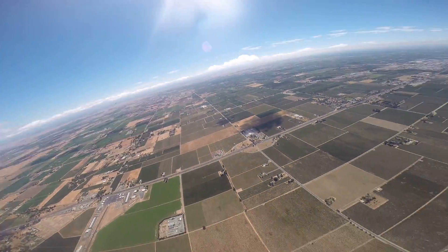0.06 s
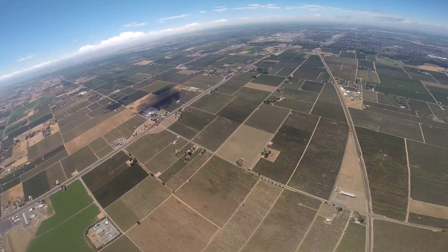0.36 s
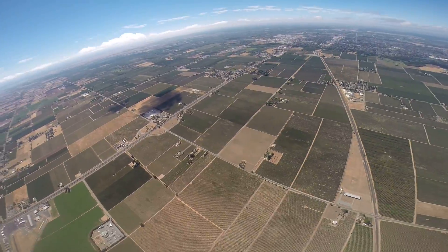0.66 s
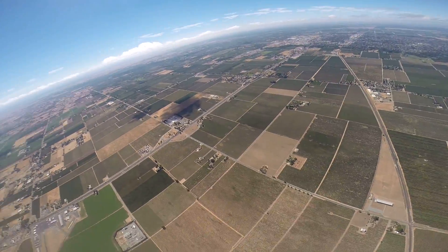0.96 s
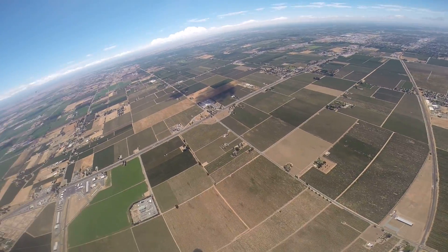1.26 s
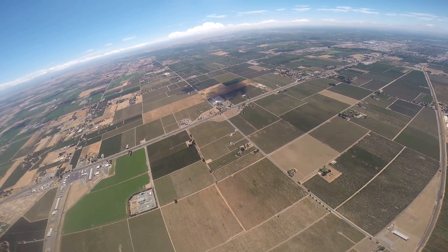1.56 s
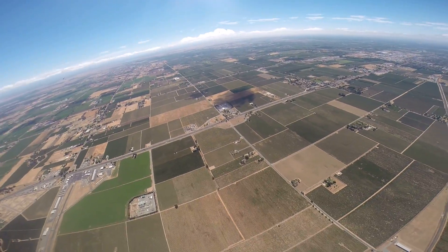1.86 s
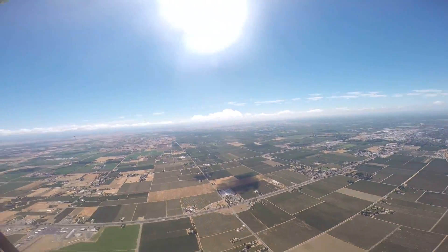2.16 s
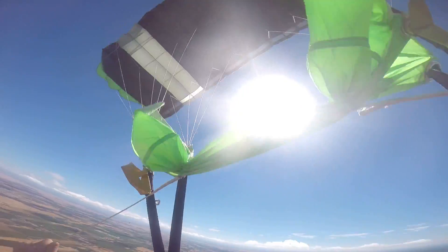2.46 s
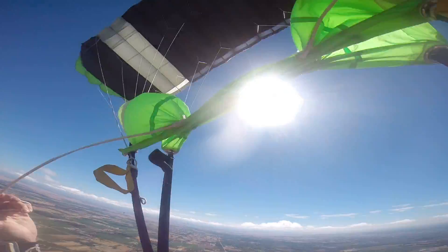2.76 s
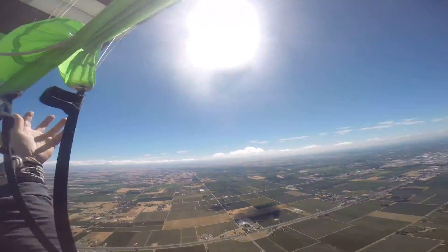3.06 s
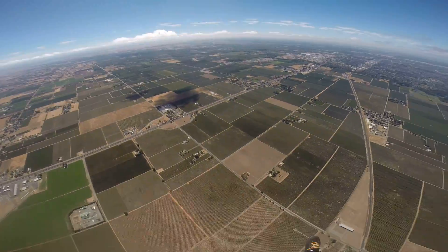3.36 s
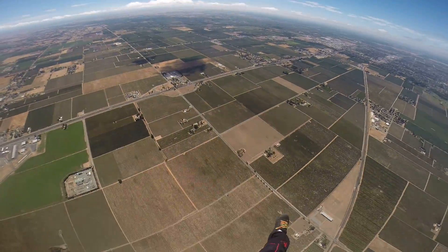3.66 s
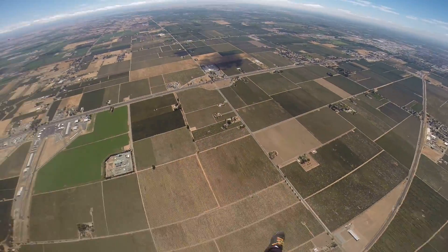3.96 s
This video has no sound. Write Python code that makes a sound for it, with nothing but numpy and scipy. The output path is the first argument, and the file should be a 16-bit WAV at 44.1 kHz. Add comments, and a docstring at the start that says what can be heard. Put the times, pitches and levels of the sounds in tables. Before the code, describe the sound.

Wind rushes over a head-worn microphone under an open parachute, strongest in the first second, when the canopy cloth snaps several times. The rush then eases. From about 2.4 to 3.1 seconds, low throbbing buffets hit the microphone while harness fabric rustles and ticks. A faint, high, breathy whistle of air passes around 3.3 seconds, and a piece of gear clacks close by at 3.8 seconds.

```python
"""Wind under an open parachute

Air rushes past a head-worn camera, rings the hollows of its housing and eases off.
As the head tips back, eddies buffet the microphone and harness fabric rustles; as it swings
forward, air whistles on the housing's edge. The canopy cloth snaps a few times as it pulls taut.
Near the end a piece of gear clacks close by."""
import sys
import numpy as np
from scipy import signal
from scipy.fft import rfft, irfft
from scipy.io import wavfile

SR = 44100
rng = np.random.default_rng(int(sys.argv[2]) if len(sys.argv) > 2 else 0)


def inscribe(sig):
    """Save sig as 16-bit PCM at rate SR to the path in sys.argv[1].

    A 1-D sig is mono; a 2-D sig holds one channel per row.
    Samples are clipped to [-1, 1] before scaling.
    """
    pcm = np.round(np.clip(np.atleast_2d(sig).T, -1, 1) * 32767)
    wavfile.write(sys.argv[1], SR, pcm.astype(np.int16))


N = 176400
TIME_S = np.arange(N) / SR


def from_db(db):
    """Decibels to gain."""
    return 10 ** (np.asarray(db) / 20)


def rms_one(x):
    """Scale to unit rms."""
    return x / np.sqrt(np.mean(x ** 2) + 1e-20)


def in_time(rows):
    """Interpolate each column after the first (seconds) to every sample."""
    times_s, *columns = np.transpose(rows)
    return [np.interp(TIME_S, times_s, column) for column in columns]


def at_hz(points, hz):
    """Read (Hz, value) points on a log-frequency axis."""
    points_hz, values = np.transpose(points)
    return np.interp(np.log(hz + 1e-9), np.log(points_hz), values)


def shape(x, gain_at):
    """Filter x by gain_at(hz)."""
    return irfft(rfft(x) * gain_at(np.arange(N // 2 + 1) * SR / N), N)


def noise(colour):
    """Unit-rms noise. Each row of colour: frequency in Hz, relative level in dB."""
    return rms_one(shape(rng.standard_normal(N), lambda hz: from_db(at_hz(colour, hz))))


def drift(rate_hz):
    """Unit-rms random wander, from 1 Hz to about rate_hz."""
    return rms_one(shape(rng.standard_normal(N), lambda hz: (hz > 1) / (1 + (hz / rate_hz) ** 2)))


def gate(rows, fade_s=0.02):
    """Open from a curve's first time to its last."""
    return np.clip(np.minimum(TIME_S - rows[0][0], rows[-1][0] - TIME_S) / fade_s, 0, 1)


def puff(x, start_s, length_s, level_db, attack_s=0.0005):
    """Burst of noise x: linear attack, Gaussian decay."""
    age_s = np.maximum(TIME_S - start_s, 0)
    envelope = np.minimum(age_s / attack_s, 1) * np.exp(-np.minimum((age_s / length_s) ** 2, 50))
    return from_db(level_db) * rms_one(x * envelope) * np.sqrt(np.mean(envelope ** 2))


def housing(x):
    """The housing's hollows lift and dip narrow bands of x; unit rms out."""
    # Each row: centre in Hz, width in Hz, lift in dB.
    resonances = [(1392, 70, 3.5), (1618, 167, 5), (1820, 47, 3.5), (2170, 50, -1), (2601, 214, 5),
                  (3090, 73, 4.5), (4210, 93, 2.5), (4450, 280, -3.5), (4930, 166, 6.5), (5880, 510, 5.5),
                  (7440, 300, 3), (8100, 500, -4), (8990, 360, 6.5)]

    def gain_at(hz):
        return from_db(sum(lift_db / (1 + (2 * (hz - centre_hz) / width_hz) ** 2)
                           for centre_hz, width_hz, lift_db in resonances))
    return rms_one(shape(x, gain_at))


def wash():
    """Dull, lumpy wash of air on the microphone port."""
    # Each row: time in seconds, level in dB.
    levels = [(0, -34.5), (.4, -37), (.9, -40.5), (1.4, -43), (1.9, -42), (2.15, -40), (2.35, -44),
              (2.45, -37), (2.6, -42.5), (2.95, -44.5), (3.1, -36.5), (3.3, -42.5), (3.45, -41.5),
              (3.7, -43), (4, -43)]
    # Each row: frequency in Hz, relative level in dB.
    colour = [(100, -1.5), (220, 1), (330, 1), (500, -3), (750, -6.5), (1100, -4.5), (1800, -12),
              (4000, -43.5)]
    level_db, = in_time(levels)
    return noise(colour) * from_db(level_db + 1.5 * drift(rate_hz=12))


def whistle(centre_hz=8700, half_width_hz=800):
    """Air grazes the housing's edge as the head swings forward: a breathy band of noise."""
    # Each row: time in seconds, level in dB.
    levels = [(3.15, -66), (3.27, -54), (3.35, -56), (3.43, -58), (3.6, -59)]
    level_db, = in_time(levels)
    band = shape(rng.standard_normal(N), lambda hz: 1 / (1 + ((hz - centre_hz) / half_width_hz) ** 2) ** 2)
    return rms_one(band) * from_db(level_db) * gate(levels)


def harness(width_octaves=0.72, grain_db=6.5):
    """Harness fabric rubs: short grainy rustles and ticks, each in its own band."""
    # Each row: start in seconds, length in seconds, level in dB, centre in Hz.
    rustles = [(2.387, 0.071, -45.5, 9700), (2.399, 0.0063, -38.5, 9000), (2.412, 0.042, -34, 2000),
               (2.441, 0.0052, -28, 5500), (2.442, 0.0068, -28, 2200), (2.459, 0.0039, -27.5, 4200),
               (2.460, 0.0041, -21, 2010), (2.474, 0.0037, -42, 8000), (2.521, 0.0049, -27.5, 3530),
               (2.651, 0.0036, -23, 1550), (2.718, 0.16, -56, 6960), (2.766, 0.006, -30, 2470),
               (2.766, 0.0036, -57, 7000), (2.801, 0.0054, -44, 6450), (2.866, 0.0045, -45, 6500),
               (2.894, 0.0083, -47.5, 7000), (2.947, 0.0043, -41.5, 6500), (3.033, 0.0055, -32, 2800),
               (3.171, .005, -30.5, 4970), (3.172, 0.0027, -40.5, 10000), (3.315, 0.01, -26.5, 2200),
               (3.384, .02, -37.5, 3480)]
    grains = rng.standard_normal(N) * from_db(grain_db * drift(rate_hz=400))
    out = np.zeros(N)
    for start_s, length_s, level_db, centre_hz in rustles:
        edges_hz = centre_hz * 2 ** (np.array([-.5, .5]) * width_octaves)
        bandpass = signal.butter(1, edges_hz, "band", fs=SR, output="sos")
        rub = signal.sosfilt(bandpass, signal.sosfilt(bandpass, grains))
        out += puff(rub, start_s, length_s, level_db)
    return out


def buffet():
    """Eddies press on the microphone port: a lumpy rumble."""
    # Each row: time in seconds, level in dB.
    levels = [(0, -32), (.45, -32), (1, -36.5), (1.3, -39), (2, -36.5), (2.38, -32.5), (2.49, -26.5),
              (2.62, -27), (2.8, -23), (2.95, -36), (3.1, -31.5), (3.4, -37), (3.8, -38), (4, -43)]
    # Each row: frequency in Hz, relative level in dB.
    colour = [(12, -4), (28, -4), (50, -4.5), (92, 1), (120, -1.5), (160, -8), (230, -20), (400, -53),
              (1000, -64)]
    level_db, = in_time(levels)
    return noise(colour) * from_db(level_db + 1.55 * drift(rate_hz=4))


def vortices(jitter=0.11):
    """Vortices shed with the head tipped back: an uneven low throb, one cycle each."""
    # Each row: time in seconds, shedding rate in Hz, level in dB.
    shedding = [(2.38, 34.87, -47.5), (2.48, 35.1, -27), (2.6, 60.3, -22.5), (2.7, 58.1, -33),
                (2.8, 70.7, -33.5), (2.9, 82.4, -24.5), (3.0, 86, -31.5), (3.15, 82, -55)]
    shed_hz, level_db = in_time(shedding)
    cycles = np.cumsum(shed_hz * (1 + jitter * drift(rate_hz=40.2))) / SR
    return np.sqrt(2) * np.sin(2 * np.pi * cycles) * from_db(level_db) * gate(shedding)


def gear():
    """Gear rings one set of modes: a light bright tick, a duller main strike, then faint bounces."""
    # Each row: time in seconds, impulse level in dB, low-pass cutoff in Hz.
    contacts = [(3.7877, -14.5, 13000), (3.7883, -6, 7040), (3.7892, 2.5, 3400), (3.7970, -16, 5000),
                (3.7990, -12, 3800), (3.8030, -17, 2500)]
    # Each row: frequency in Hz, gain in dB, T60 in seconds.
    modes = [(109, -30, .06), (466, -19.5, 0.027), (1343, -19.5, 0.047), (1850, -17, .028),
             (2260, -14, 0.035), (2720, -1, 0.016), (2985, -4, 0.011), (3770, -11.5, 0.015),
             (4220, -15, .012), (4710, -9.5, 0.0095), (5130, -7.5, 0.0074), (7360, -15.5, 0.0072),
             (8570, -14, 0.0057), (10300, -26, .005)]
    force, out = np.zeros(N), np.zeros(N)
    for time_s, impulse_db, cutoff_hz in contacts:
        impulse = from_db(impulse_db) * (np.arange(N) == int(time_s * SR))
        force += signal.sosfilt(signal.butter(2, cutoff_hz, fs=SR, output="sos"), impulse + 1e-18)
    for k, (mode_hz, gain_db, t60_s) in enumerate(modes):
        radius = np.exp(-np.log(1000) / (t60_s * SR))
        step_rad = 2 * np.pi * mode_hz / SR
        ring = signal.lfilter([0, np.sin(step_rad)], [1, -2 * radius * np.cos(step_rad), radius ** 2], force)
        out += (-1) ** k * from_db(gain_db) * ring
    return out


def canopy():
    """Cloth pulls taut: a dull thump and a crack that rings the housing."""
    # Each row: start in seconds, length in seconds, thump level in dB, crack level in dB.
    snaps = [(0.075, .008, -24, -27), (.084, 0.011, -24.5, -13), (0.365, 0.0022, -14.5, -28),
             (0.368, 0.0065, -25, -11), (0.373, 0.0094, -20.5, -25), (0.589, 0.0096, -23.5, -18),
             (0.7, 0.01, -33, -36), (0.834, 0.0099, -30.5, -28), (2.152, .008, -31, -36)]
    # Each row of both: frequency in Hz, relative level in dB.
    thump_colour = [(60, -7), (170, -9), (330, 3.5), (700, -5), (1100, -4.5), (2000, -41), (6000, -54)]
    crack_colour = [(600, -19), (1100, -24), (1400, -1), (2200, 1.5), (3100, -7.5), (4000, -18.5),
                    (6000, -21.5), (9000, -28.5), (15000, -46)]
    thump, crack = noise(thump_colour), housing(noise(crack_colour))
    return sum(puff(thump, start_s, length_s, thump_db) + puff(crack, start_s, length_s, crack_db)
               for start_s, length_s, thump_db, crack_db in snaps)


def rush(level_db=-27, gust_db=0.24, flutter_db=0.5, patchy_db=0.73):
    """Turbulent air through the housing; four registers waver together and on their own."""
    # Each row: time in seconds, then roar, presence, treble and hiss in dB, relative within a column.
    contours = [(0, -27.5, -26.5, -30, -43.0), (0.15, -23.5, -21, -32.5, -41.5),
                (0.32, -25.5, -25.5, -35.5, -42.5), (0.45, -19.5, -26, -34.5, -46.5),
                (0.62, -20.5, -26.5, -37, -47), (0.8, -25, -29.5, -39, -48),
                (1.03, -23.5, -27.5, -39.5, -48), (1.13, -30.5, -30.5, -42, -48.5),
                (1.3, -32.5, -31.5, -44, -50.5), (1.6, -31.5, -34.0, -48, -57.5),
                (1.9, -31.5, -34.5, -47, -58.0), (2.08, -29, -33.5, -46.5, -59),
                (2.17, -26, -28.5, -42.5, -52), (2.26, -28.5, -32.0, -43.5, -53),
                (2.35, -31.5, -37.5, -43, -55.0), (2.49, -32, -33.5, -48, -59),
                (2.62, -34.5, -43, -49, -65), (2.9, -36, -41.5, -53, -63), (3.0, -35, -36.5, -51.5, -58.5),
                (3.09, -29.5, -32.5, -48.5, -57.5), (3.21, -38.5, -34.5, -46.5, -58.5),
                (3.29, -39, -37.5, -49, -53), (3.36, -40.5, -36.0, -50, -47), (3.41, -31.0, -31, -37, -48),
                (3.52, -29, -31.5, -43.5, -52), (3.65, -30.5, -34.5, -46.0, -53.5),
                (3.85, -32, -35.5, -48, -56.5), (4.0, -31.5, -33.5, -46, -55.5)]
    # Centres of those registers in Hz.
    centres_hz = [1550, 2660, 5300, 9050]
    # Each row: frequency in Hz, relative level in dB.
    colour = [(500, -41), (900, -22.5), (1130, -16), (1330, -2), (1750, -4), (2100, -6), (2900, -8),
              (3700, -18), (6000, -21), (6800, -27), (9700, -30.5), (12500, -44), (15500, -57)]
    air = housing(noise(colour))
    shared_db = gust_db * drift(rate_hz=5.8) + flutter_db * drift(rate_hz=50)
    out = np.zeros(N)
    for contour_db, weights in zip(in_time(contours), np.eye(len(centres_hz))):
        register = shape(air, lambda hz: at_hz(list(zip(centres_hz, weights)), hz))
        waver_db = shared_db + patchy_db * drift(rate_hz=34)
        out += register * rms_one(from_db(contour_db)) * from_db(waver_db)
    return from_db(level_db) * out


def scene():
    """Wind, cloth and gear at one microphone."""
    wind = wash() + buffet() + rush() + whistle() + vortices()
    return (wind + canopy() + harness() + gear())[None]


def record(dry):
    """Clip at full scale, then low-pass."""
    cutoff_hz = 15400
    lowpass = signal.ellip(10, .1, 80, cutoff_hz, fs=SR, output="sos")
    return signal.sosfilt(lowpass, np.clip(dry, -1, 1))


dry = scene()
out = record(dry)
inscribe(out)
```